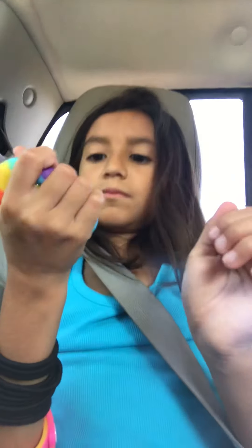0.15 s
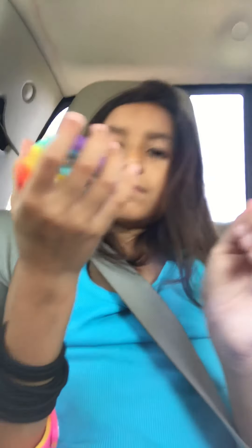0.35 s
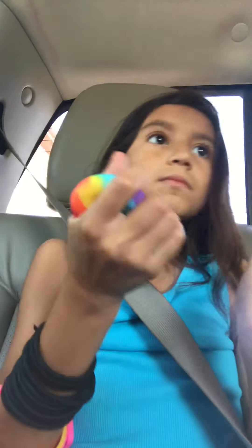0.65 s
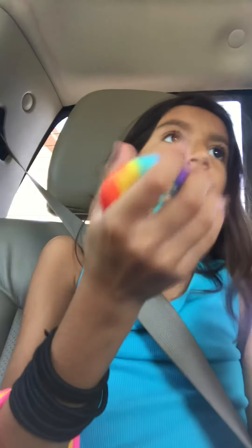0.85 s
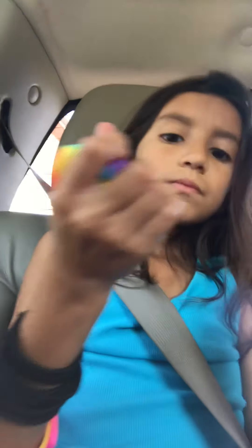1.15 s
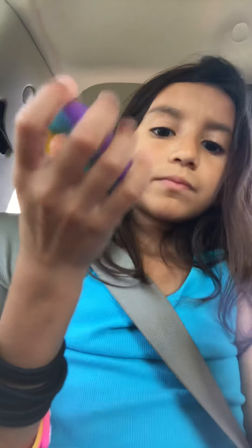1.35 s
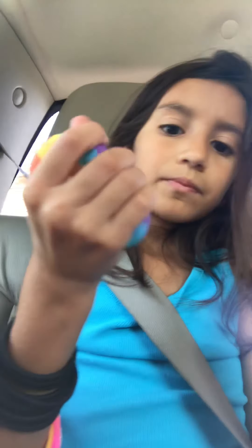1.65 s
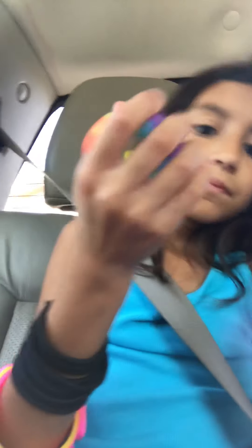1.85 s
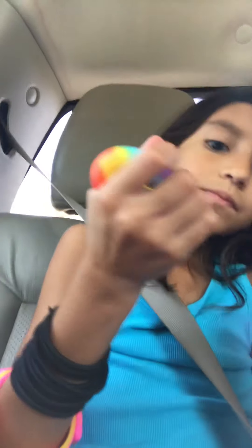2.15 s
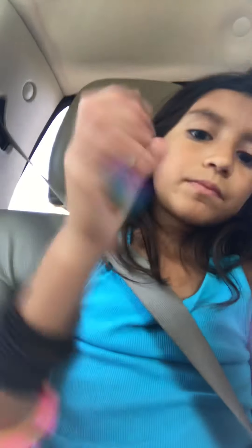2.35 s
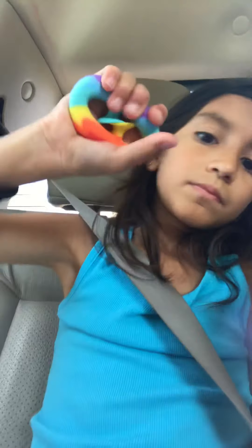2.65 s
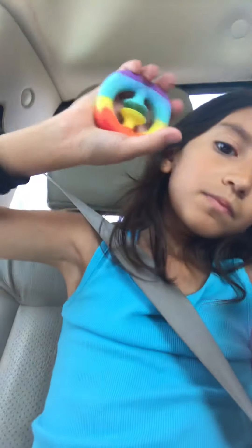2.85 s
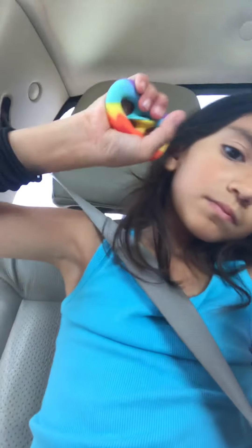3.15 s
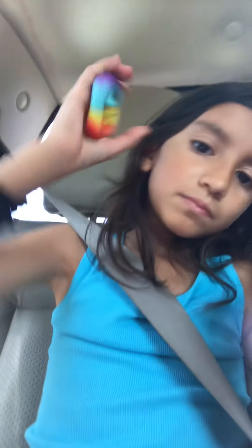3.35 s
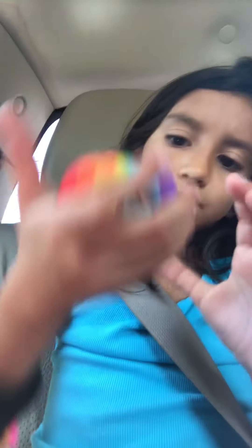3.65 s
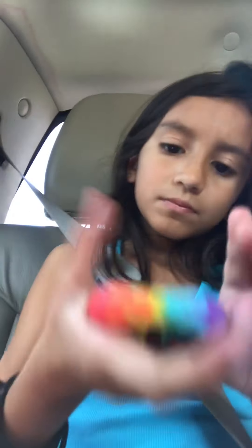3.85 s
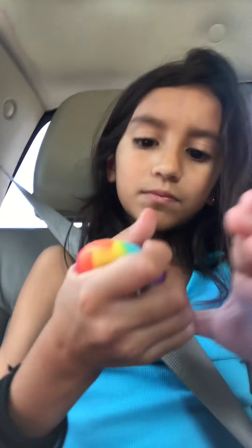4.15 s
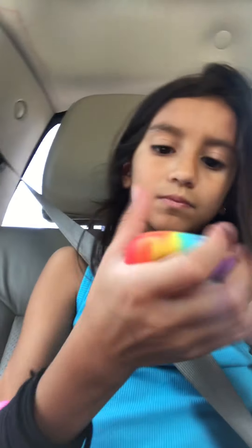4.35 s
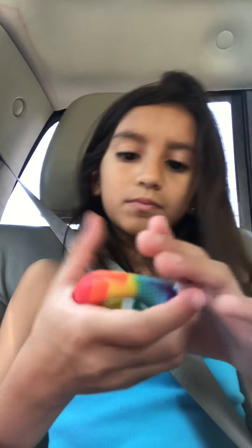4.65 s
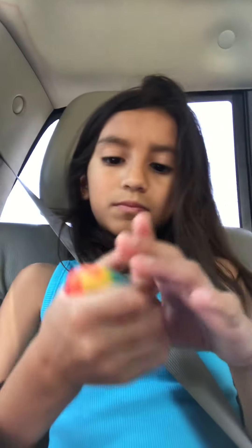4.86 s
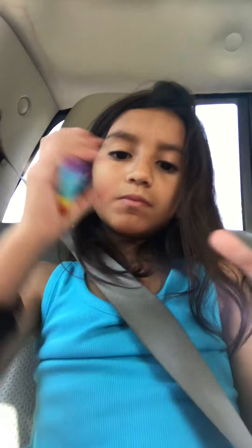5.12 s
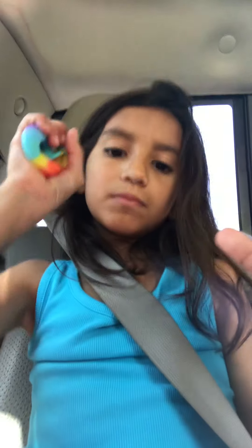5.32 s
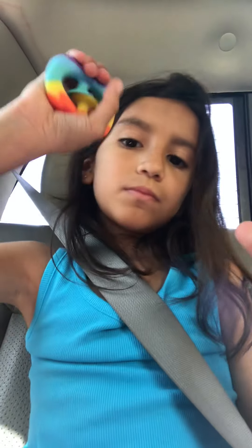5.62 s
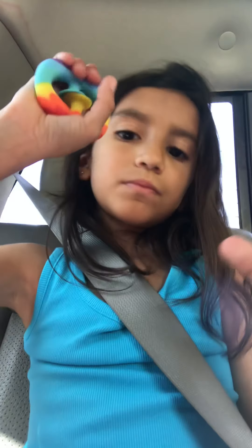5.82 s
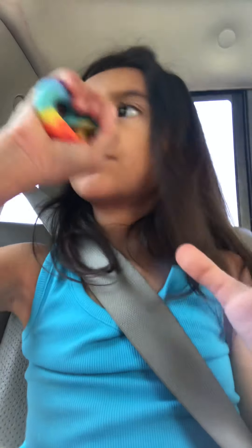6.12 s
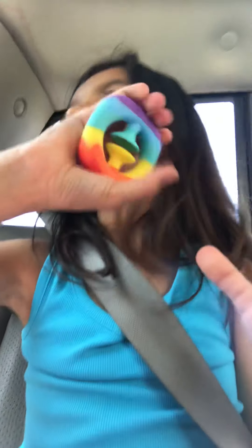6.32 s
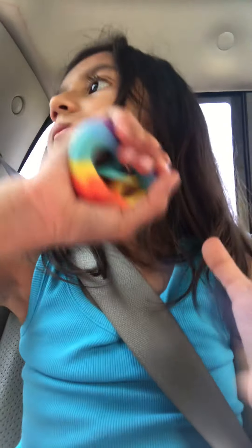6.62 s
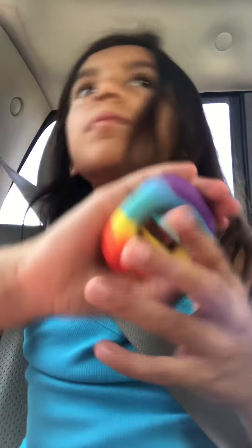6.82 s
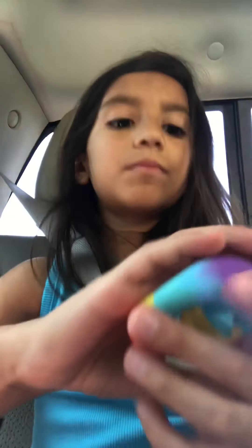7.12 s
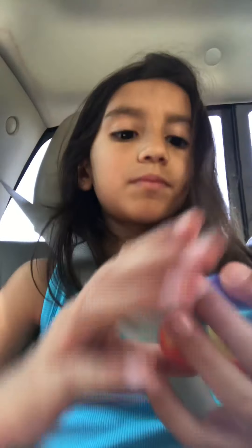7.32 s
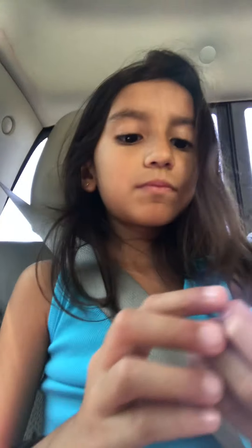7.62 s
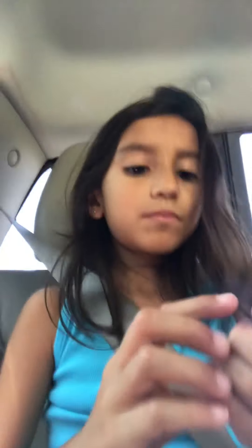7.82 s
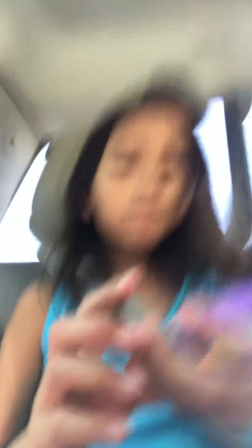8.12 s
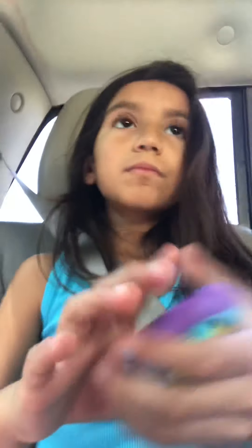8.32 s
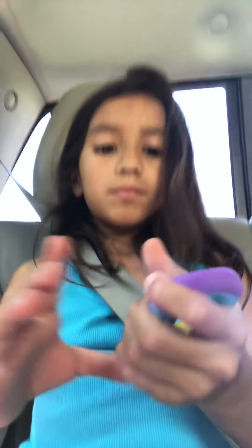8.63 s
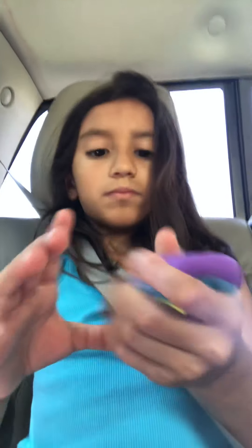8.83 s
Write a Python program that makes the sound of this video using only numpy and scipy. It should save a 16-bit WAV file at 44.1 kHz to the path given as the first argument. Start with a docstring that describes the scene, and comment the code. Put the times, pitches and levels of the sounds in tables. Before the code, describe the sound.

Close, crisp suction pops snap one after another in a small upholstered cabin with almost no reverberation. The early ones are hollow with a low thud, the later ones cleaner and stronger. Below them lie soft tyre roar, deep body rumble and an engine hum that rises, then sinks. Skin creaks faintly on rubber. After the last pop, fingers knock and scrape the phone and brush cloth, over slight microphone hiss.

```python
"""A child squeezes a suction-cup snap toy in the back seat of a moving car, close to a hand-held phone.
Throughout, the road rumbles and the cabin booms with the drivetrain, under faint microphone hiss.
From the first second the cups pop apart thirteen times, each a damped pulse of air with echoes and ringing
rims. Around the pops fingers tick and rub on the rubber as pulses and stick-slip grains.
Near the end the phone is shifted and brushes over cloth, with denser ticks, rubs and ribbed buzzes."""
import sys
import numpy as np
from scipy import signal
from scipy.fft import rfft, irfft
from scipy.io import wavfile
from scipy.ndimage import uniform_filter1d

SR = 44100
rng = np.random.default_rng(int(sys.argv[2]) if len(sys.argv) > 2 else 0)


def generate_wav(sig):
    """Save sig (samples, or channels by samples) to the path in sys.argv[1] as 16-bit PCM at SR."""
    pcm = np.round(np.clip(np.atleast_2d(sig).T, -1, 1) * 32767).astype(np.int16)
    wavfile.write(sys.argv[1], SR, pcm)


N = 396018
T = np.arange(N) / SR  # seconds
TAPS = 4096  # length of the short responses in samples
HZ = np.fft.rfftfreq(TAPS, 1 / SR)  # their frequency axis
NOISE_HZ = np.fft.rfftfreq(N, 1 / SR)  # frequency axis of the whole scene

# Spectrum of a fingertip tick. Each row: frequency in Hz, level in dB.
TICK_SPECTRUM = [(150, -14.5), (650, -1.5), (1000, -11.5), (1500, -1.5), (1900, -6.5), (2450, 2.5),
                 (2750, -2.5), (3100, -17), (4500, -29), (8000, -43), (15000, -52)]
# Skin and cloth rub. Each row: hardest press in seconds, rise in seconds, fall in seconds,
# relative level in dB, relative level of the low body in dB.
RUB_STROKES = [(.46, .06, .1, -63, -57.5), (1.05, .13, .1, -53.5, -50), (1.957, .015, .025, -51.5, -39),
               (2.056, .015, .11, -57, -55), (2.904, .02, 0.049, -56, -62), (6.41, .08, .05, -61, -59),
               (7.812, 0.11, 0.054, -45.5, -42), (7.86, .012, .07, -52, -46), (7.97, .16, 0.28, -53, -50),
               (8.136, .03, .05, -41, -37.5), (8.218, .05, .11, -51, -50)]


def amp(db):
    """Decibels to gain."""
    return 10 ** (np.asarray(db) / 20)


def unit(x):
    """Scales to rms 1."""
    return x / np.sqrt(np.mean(x ** 2) + 1e-20)


def read(points, hz):
    """Reads a spectrum on a log-frequency axis."""
    f, value = np.transpose(points)
    return np.interp(np.log(hz + 1), np.log(f + 1), value)


def add(mix, s, sound):
    """Mixes a sound in at time s."""
    part = mix[max(round(s * SR), 0):][:len(sound)]
    part += sound[:len(part)]


def hump(hz, centre_hz, octaves):
    """A bell of height 1 on a log-frequency axis."""
    return np.exp(-.5 * (np.log2((hz + 1) / centre_hz) / octaves) ** 2)


def coloured(x, points):
    """Filters a signal by a spectrum and scales it to rms 1."""
    gain = amp(read(points, np.fft.rfftfreq(len(x), 1 / SR)))
    return unit(irfft(rfft(x) * gain, len(x)))


def band_noise(centre_hz, octaves):
    """Noise in one bell-shaped band, at rms 1."""
    return unit(irfft(rfft(rng.standard_normal(N)) * hump(NOISE_HZ, centre_hz, octaves), N))


def click(db):
    """The minimum-phase pulse of a spectrum: its energy comes as early as possible."""
    log_gain = np.log(amp(np.r_[db, db[-2:0:-1]]))
    return np.fft.ifft(np.exp(np.conj(signal.hilbert(log_gain)))).real[:TAPS // 2]


def catches(per_s, spread_db):
    """Sparse impulses at random times: many small slips and a few stronger ones."""
    size = amp(spread_db * np.minimum(rng.exponential(1, N), 3))
    return size * (rng.random(N) < per_s / SR)


def drift(rate_hz):
    """A slow random wander of rms 1."""
    return unit(irfft(rfft(rng.standard_normal(N)) * np.exp(-(NOISE_HZ / rate_hz) ** 2), N))


def swells(rows, rest_db):
    """A resting gain with bell-shaped swells on top, summed in power."""
    power = amp(rest_db) ** 2
    for s, length_s, db in rows:
        power = power + (amp(db) * np.exp(-2 * ((T - s) / length_s) ** 2)) ** 2
    return np.sqrt(power)


def stroke(s, rise_s, fall_s, depth_db=21):
    """The pressure of a rub gains depth_db over its rise to time s, then loses it over its fall."""
    away = np.maximum((s - T) / rise_s, (T - s) / fall_s)
    return amp(-depth_db * away) * np.clip(3 - 2 * away, 0, 1)  # silent beyond 1.5 rises or falls


def tyre_roar(level_db=-53.5, swell_db=1):
    """Tyre roar is coloured noise whose lows swell as the road surface varies."""
    # Spectrum of the road. Each row: frequency in Hz, level in dB.
    road_spectrum = [(65, -30.5), (110, 2), (141, -9.5), (222, -4.5), (297, -11.5), (397, -12.5),
                     (427, -14.5), (598, -11.5), (672, -21.5), (954, -23), (1120, -27.5), (1610, -31.5),
                     (2610, -32), (3600, -40), (4680, -72), (7920, -120)]
    tyres = coloured(rng.standard_normal(N), road_spectrum) * amp(level_db)
    lows = signal.sosfiltfilt(signal.butter(2, 900, fs=SR, output="sos"), tyres)
    surface = unit(uniform_filter1d(rng.standard_normal(N), size=5000))
    return tyres + lows * (amp(swell_db * surface) - 1)


def body_rumble(trim_db=1, rest_db=-48.5):
    """Bumps and rough road shake the car's body, heard as swelling low noise."""
    # Spectrum of the shaken body. Each row: frequency in Hz, level in dB.
    rumble_spectrum = [(12, -26), (25, -20), (41, 1.5), (55, 0), (80, 0.5), (120, -13.5), (170, -15.5),
                       (300, -67)]
    # Bumps. Each row: middle in seconds, length in seconds, relative level in dB.
    bump_rows = [(.4, .5, -46), (2.3, 1.6, -47), (3.62, .14, -43), (3.94, 0.088, -43.5), (7.08, 0.099, -42),
                 (7.82, .16, -40.5), (8.08, .25, -41.5), (8.45, .15, -46)]
    return coloured(rng.standard_normal(N), rumble_spectrum) * swells(bump_rows, rest_db) * amp(trim_db)


def drivetrain_boom(trim_db=0.5, rest_db=-53, waver_db=1.13, waver_hz=5, second_db=-22):
    """The cabin booms on a tone and its octave, which glide with the engine speed."""
    # Engine speed. Each row: time in seconds, pitch of the boom in Hz.
    engine_glide = [(0, 46), (.75, 46.5), (1.2, 56), (1.5, 59.9), (1.85, 69), (2.22, 70.06), (2.6, 79),
                    (3.15, 88.04), (3.5, 84.04), (4.45, 83.04), (4.9, 73), (5.15, 59), (7.0, 57.32),
                    (8.4, 46), (8.98, 46.1)]
    # The boom swells in the cabin. Each row: middle in seconds, length in seconds, relative level in dB.
    boom_rows = [(.5, .45, -43.5), (1.35, 0.26, -36.5), (2.05, 0.46, -38.5), (2.62, .45, -38),
                 (3.1, .45, -41.5), (4.65, .4, -51), (5.4, 0.48, -37.5), (6.7, .55, -39.5),
                 (7.85, 0.34, -43.5)]
    phase = 2 * np.pi * np.cumsum(np.interp(T, *np.transpose(engine_glide))) / SR
    tone = unit(np.sin(phase) + amp(second_db) * np.sin(2 * phase))
    return tone * swells(boom_rows, rest_db) * amp(trim_db + waver_db * drift(waver_hz))


def hiss(centre_hz=2550, octaves=0.1, rest_db=-79, flicker_db=3.5, flicker_hz=14):
    """A narrow band of soft, flickering noise that swells now and then."""
    # Swells of the thin hiss. Each row: middle in seconds, length in seconds, relative level in dB.
    hiss_rows = [(.58, 0.25, -72.5), (4.2, 0.65, -67), (7.3, 0.28, -70.5)]
    flicker = amp(flicker_db * drift(flicker_hz) - 1)
    return band_noise(centre_hz, octaves) * swells(hiss_rows, rest_db) * flicker


def whisks(length_s=0.019, centre_hz=7500, octaves=.5):
    """Dry skin whisks over the rubber in brief, faint, bright bursts of noise."""
    # Whisks. Each row: middle in seconds, level in dB.
    whisk_rows = [(.14, -73), (.5, -71), (2.0, -72), (2.53, -73), (4.46, -66.5), (4.61, -68.5),
                  (4.72, -68.5), (5.96, -73), (8.87, -71)]
    brush = sum(amp(db) * np.exp(-(2 * (T - s) / length_s) ** 2) for s, db in whisk_rows)
    return band_noise(centre_hz, octaves) * brush


def zips(jitter=0.014, overtone_db=-8.5):
    """A finger drags over ribbed cloth: the ribs buzz at a pitch that follows its speed."""
    # One table a stroke. Each row: time in seconds, ribs per second, level in dB.
    zip_strokes = [
        [(.385, 280, -56), (.41, 153, -38), (.44, 74, -47)],
        [(7.72, 165, -50), (7.80, 212, -53), (7.87, 333, -54.5), (7.92, 420, -50)],
        [(8.14, 410, -42), (8.17, 325, -49), (8.22, 245, -47), (8.26, 160, -49), (8.295, 137, -38.5),
         (8.35, 110, -63)],
    ]
    out = np.zeros(N)
    for rows in zip_strokes:
        s, ribs_hz, db = np.transpose(rows)
        t = np.arange(s[0], s[-1], 1 / SR)
        waver = unit(uniform_filter1d(rng.standard_normal(len(t)), size=200))
        turns = np.cumsum(np.interp(t, s, ribs_hz) * (1 + jitter * waver)) / SR
        buzz = sum(amp(overtone_db * k) * np.sin(2 * np.pi * (k + 1) * turns) for k in range(4))
        fade = signal.windows.tukey(len(t), .2)
        add(out, s[0], unit(buzz) * amp(np.interp(t, s, db)) * fade)
    return out


def rubs(slips_per_s=450, spread_db=2.0, smooth=0.091, patchy_db=4.0, scrape_trim_db=-2.0, body_trim_db=-0.5):
    """Stick-slip grains whose colour wanders as the contact shifts, with a low body through the phone's case."""
    # Spectrum of the rub. Each row: frequency in Hz, level in dB.
    rub_spectrum = [(88, -19), (150, 2), (194, -8), (247, 5), (449, -0.5), (542, 3), (725, 4), (790, -2.5),
                    (1370, -11), (2060, -11), (2450, -10), (3450, -35), (4310, -50), (9000, -63),
                    (11700, -78), (19800, -120)]
    slips = rng.choice([-1., 1.], N) * catches(slips_per_s, spread_db)
    z = signal.stft(slips + smooth * rng.standard_normal(N), nperseg=512)[2]
    # random patches of gain, smoothed over time and then over frequency
    patches = uniform_filter1d(rng.standard_normal(z.shape), size=5, axis=1)
    patches = unit(uniform_filter1d(patches, size=3, axis=0))
    patchy = signal.istft(z * amp(patchy_db * patches), nperseg=512)[1][:N]
    grains = coloured(patchy, rub_spectrum)
    low = signal.sosfiltfilt(signal.butter(4, 850, fs=SR, output="sos"), grains)
    scrape, body = unit(grains - low), unit(low)
    out = np.zeros(N)
    for s, rise_s, fall_s, db, low_db in RUB_STROKES:
        contact = scrape * amp(db + scrape_trim_db) + body * amp(low_db + body_trim_db)
        out += stroke(s, rise_s, fall_s) * contact
    return out


def crackle(per_s=90, trim_db=29, spread_db=2.0):
    """Under each rub the skin catches and lets go in sharp ticks."""
    press = sum(amp(db) * stroke(s, rise_s, fall_s) for s, rise_s, fall_s, db, _ in RUB_STROKES)
    tick = click(read(TICK_SPECTRUM, HZ))
    return amp(trim_db) * signal.oaconvolve(catches(per_s, spread_db) * press, tick)[:N]


def creaks(per_s=24, trim_db=-38, spread_db=3.6):
    """The rubber keeps catching faintly on the skin, in ticks at random times."""
    tick = click(read(TICK_SPECTRUM, HZ) + 6 * hump(HZ, 1870, 0.31))
    return amp(trim_db) * signal.oaconvolve(catches(per_s, spread_db), tick)[:N]


def ticks(trim_db=31, knock_trim_db=4):
    """Small slips and taps of the fingertips are short pulses with more or less of a dull knock."""
    # Ticks on the toy and the phone. Each row: start in seconds, relative level in dB,
    # relative level of the dull knock in dB.
    tick_rows = [(1.004, -51.5, 13), (1.0425, -56.5, 18), (1.3308, -50, -16), (1.59, -50.5, -4),
                 (1.7622, -49.5, 6.5), (1.9526, -58, 25), (1.9908, -52, 7), (2.9012, -49, -6),
                 (3.743, -45.5, -30), (4.0796, -49, 4), (5.2364, -68, 30.5), (7.6137, -39.5, 1),
                 (7.8059, -35, -3), (7.8277, -37.5, -2), (7.9534, -47, 11), (8.0526, -47.5, -8),
                 (8.1259, -36.5, -8), (8.371, -53, 8.5), (8.4433, -38.5, -7.5), (8.533, -58, 15.5)]
    out = np.zeros(N)
    for s, db, knock_db in tick_rows:
        shape = read(TICK_SPECTRUM, HZ) + (knock_db + knock_trim_db) * hump(HZ, 670, 0.74)
        add(out, s, amp(db + trim_db) * click(shape))
    return out


def cabin(onset_s=0.0021):
    """The very short tail of an upholstered cabin, different for every place of the hand."""
    # Decay of the cabin. Each row: frequency in Hz, time to fall by 60 dB in seconds.
    decay_times = [(200, 0.053), (600, 0.072), (1200, 0.056), (2700, 0.062), (5000, 0.057), (9000, 0.069),
                   (14000, 0.013)]
    # Colour of the cabin. Each row: frequency in Hz, level in dB.
    tail_colour = [(200, -0.5), (600, 7.5), (850, 7.5), (1400, -3.5), (2000, 2), (2600, -2.5), (3300, 4),
                   (4200, 2.5), (6000, 0.5), (9000, 1), (13000, -5.5)]
    t = np.arange(TAPS) / SR
    scatter = rng.choice([-1., 1.], TAPS) * (rng.random(TAPS) < .25)
    hz, at, z = signal.stft(scatter, SR, nperseg=128)
    decay = amp(-60 * at / read(decay_times, hz)[:, None])
    tail = signal.istft(z * decay, SR, nperseg=128)[1][:TAPS]
    tail *= np.clip(2 * t / onset_s - 1, 0, 1)  # silent for half the onset, then rising
    return signal.fftconvolve(tail / np.linalg.norm(tail), click(read(tail_colour, HZ)))[:TAPS]


def rim(ring_hz, t60_s, level_db):
    """A mode of the cup that builds up and rings for an instant, slightly retuned each time."""
    t = np.arange(TAPS // 2) / SR
    build_up = 1 - np.exp(-t * ring_hz / 5)
    tone = np.sin(2 * np.pi * ring_hz * rng.uniform(0.96, 1.02) * t)
    return amp(level_db - 60 * t / t60_s) * build_up * tone


def pop_paths(palm_s, palm_gain, tear_s=0.000693, seat_s=.00274, seat_gain=.24):
    """Direct sound of the tearing rim, with echoes off the palm and off the headrest and shoulder."""
    treble = 1 - 1 / (1 + (HZ / 4800) ** 10)
    # the rim lets go in three tiny steps, which roughen the crack
    steps_s = tear_s * np.array([0, rng.uniform(.35, .65), rng.uniform(.8, 1.5)])
    tear = np.sqrt([.45, .4, .15]) @ np.exp(-2j * np.pi * np.outer(steps_s, HZ))
    direct = 1 - treble + treble * tear
    palm = palm_gain * np.exp(-2j * np.pi * HZ * palm_s)
    seat = seat_gain * np.exp(-2j * np.pi * HZ * seat_s)
    paths = irfft(direct + (palm + seat) / (1 + (HZ / 6000) ** 2))  # skin and cloth reflect little treble
    paths[TAPS // 2:] = 0
    return paths


def snaps(tail_db=-12, tail_at_db=11, drier=.5, mid_hz=2620, top_db=-10, peel_hz=2700):
    """The seal breaks in one damped pop of air; the grip changes its colour and the hand's place its echoes."""
    # The cups pop apart. Each row: start in seconds, level in dB, pitch in Hz, hollow of the cupped hand in dB,
    # crack of the rim in dB, low thud in dB, top of the treble in Hz, delay of the echo off the palm in seconds,
    # gain of that echo.
    squeeze_rows = [(0.3647, 9, 2310, 7.5, 6.5, 13, 13000, .0014, 0.45),
                    (0.9006, 9, 2570, 7, 3, 11, 13600, .0021, .3),
                    (1.3896, 11.5, 2500, 6, 0.5, 1.5, 12900, 0.0021, 0.32),
                    (1.8795, 9.5, 2530, 3.5, 1, 5, 13200, .0016, .26),
                    (2.367, 13.5, 2702, 0.5, -2.5, -5, 12400, .0015, .43),
                    (2.8551, 13.5, 2771, -8, -6, -3, 13900, .0015, .85),
                    (3.2667, 12.5, 2730, -8, -6, 0, 13400, .0014, 0.28),
                    (4.3528, 11, 2300, 1.5, 3.5, 5.5, 13450, .0014, 0.43),
                    (5.0346, 11, 2340, -1, -2.5, 0.5, 13900, 0.00127, .55),
                    (5.4872, 15, 2620, -5, -7, 7, 11500, .0014, 0.41),
                    (5.8769, 15.5, 2760, -6, -8.5, 4.5, 12100, .0015, 0.62),
                    (6.316, 16, 2590, -9.5, -10, -12, 13000, 0.00149, .61),
                    (6.7386, 18.5, 2820, -4, -7.5, -9, 12000, .00148, 0.4)]
    # Spectrum of one pop. Each row: frequency in Hz, level in dB.
    pop_spectrum = [(120, -16.5), (350, -20), (600, -16), (850, -23), (1300, -4), (1750, -8.5), (2600, 1),
                    (3250, -5.5), (3900, -14.5), (4900, -18), (7400, -17), (9000, -13), (10400, -16.5),
                    (12200, -16)]
    out = np.zeros(N)
    pole = .7 * np.exp(2j * np.pi * peel_hz / SR)
    lag = np.poly([pole, np.conj(pole)]).real
    for s, db, hz, hollow, crack, thud, top_hz, palm_s, palm_gain in squeeze_rows:
        cup_hz = HZ * (mid_hz / hz) ** hump(HZ, mid_hz, 0.35)  # only the air between the cups is retuned
        shape = read(pop_spectrum, cup_hz)
        shape += hollow * hump(HZ, 1220, 0.22)
        shape += thud * hump(HZ, 550, 0.42)
        shape += crack * hump(HZ, 9050, 0.69)
        shape += np.maximum(top_db * (HZ / top_hz) ** 16, -45)  # soft rubber has no highest treble
        # the seal peels, so an all-pass filter lets the pop swell for a cycle
        pop = signal.lfilter(lag[::-1], lag, click(shape))
        wet_db = tail_db - drier * (db - tail_at_db)  # louder pops are nearer, so drier
        response = pop_paths(palm_s, palm_gain) + amp(wet_db) * cabin()
        add(out, s, amp(db) * signal.fftconvolve(pop, response))
        add(out, s, amp(db + crack) * rim(ring_hz=9200, t60_s=0.017, level_db=-42.0))
        # the freed cup rings on
        freed_s = s + palm_s
        add(out, freed_s, amp(db) * rim(ring_hz=2613, t60_s=0.019, level_db=-37.5))
        add(out, freed_s, amp(db + hollow) * rim(ring_hz=1416, t60_s=0.013, level_db=-48.0))
        add(out, freed_s, amp(db + thud / 2) * rim(ring_hz=598, t60_s=.03, level_db=-45.5))
    return out


def scene(fingers_wet_db=-12):
    """The car, rubbing at the phone, and the fingers and toy in the cabin."""
    car = drivetrain_boom() + body_rumble() + tyre_roar()
    fingers = ticks() + creaks() + crackle()
    fingers = fingers + amp(fingers_wet_db) * signal.oaconvolve(fingers, cabin())[:N]
    brushes = hiss() + whisks() + zips() + rubs()
    return (car + brushes + fingers + snaps())[None]


def record(dry, hiss_db=-74.5, edge_hz=15800):
    """The microphone's own hiss, then the phone's band limit."""
    # Spectrum of the microphone hiss. Each row: frequency in Hz, level in dB.
    mic_spectrum = [(2500, -22), (3700, -1.5), (4400, 2), (4900, -5.5), (5500, 2), (7000, -2), (9500, -7),
                    (10400, -12.5), (11300, -7.5), (15800, -11)]
    heard = dry + amp(hiss_db) * coloured(rng.standard_normal(N), mic_spectrum)
    low_pass = signal.firwin(511, edge_hz, window=("kaiser", 9), fs=SR)
    return signal.oaconvolve(heard, low_pass[None], "same")


dry = scene()
out = record(dry)
generate_wav(out)
```